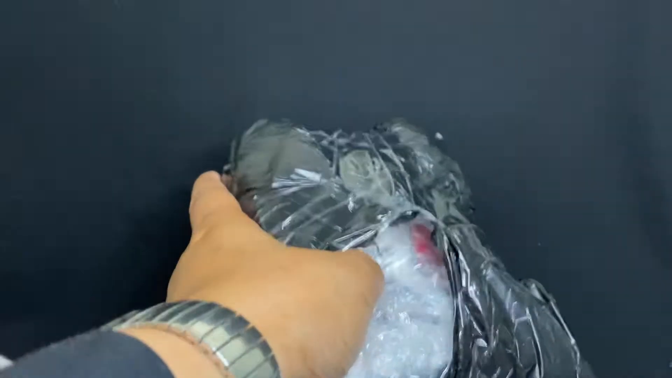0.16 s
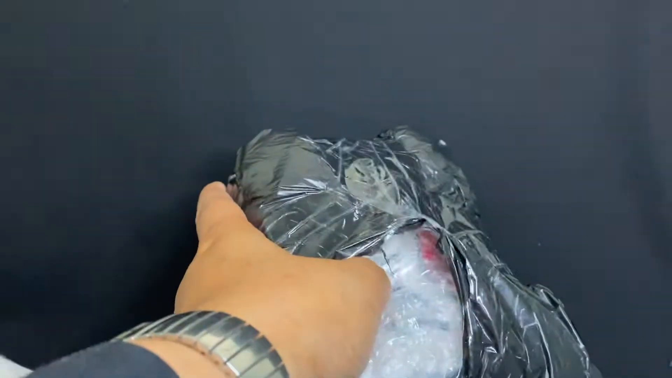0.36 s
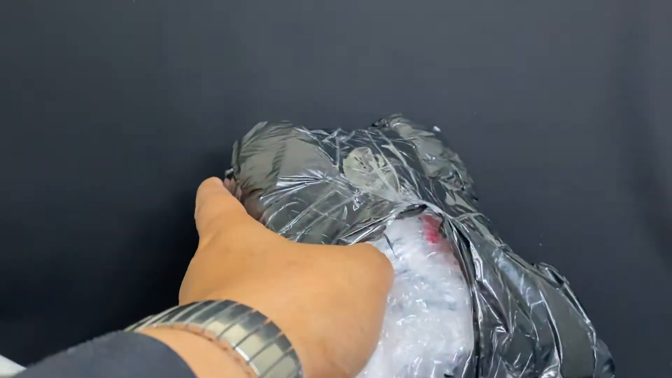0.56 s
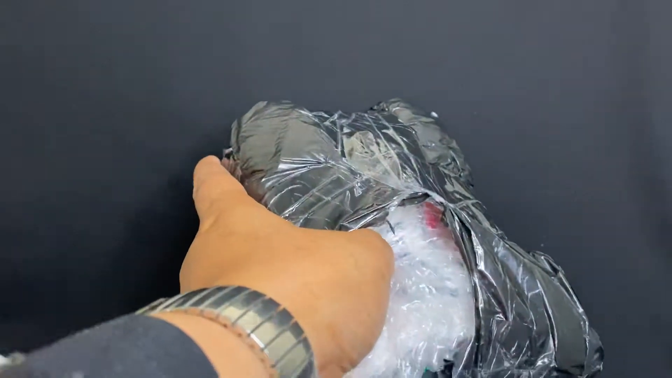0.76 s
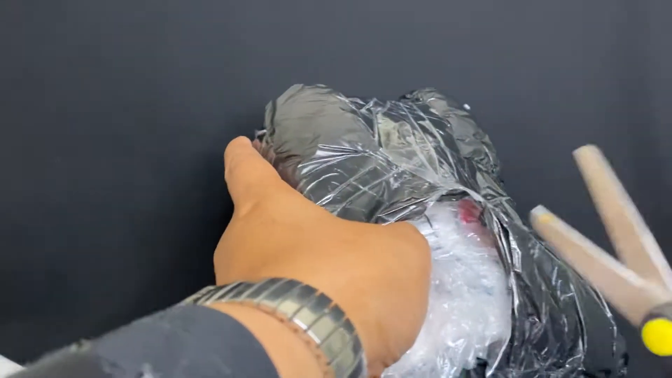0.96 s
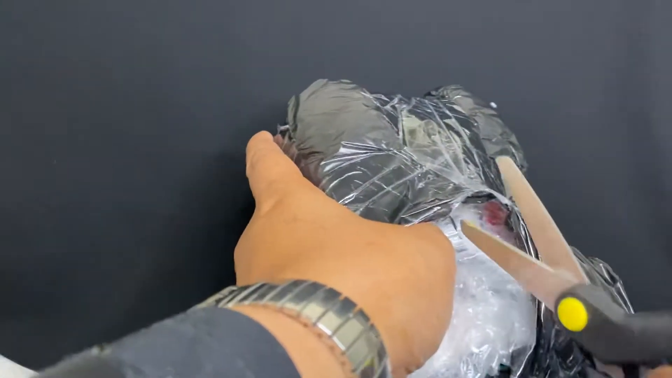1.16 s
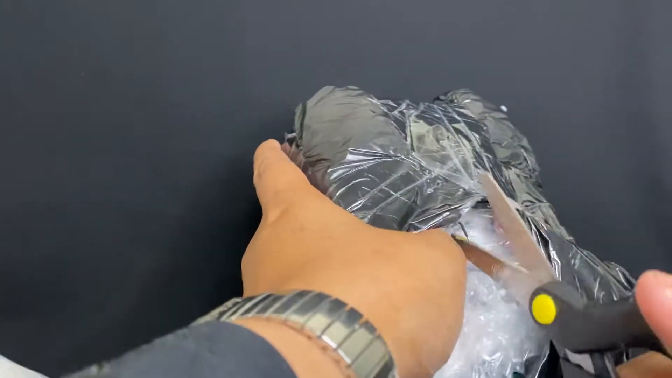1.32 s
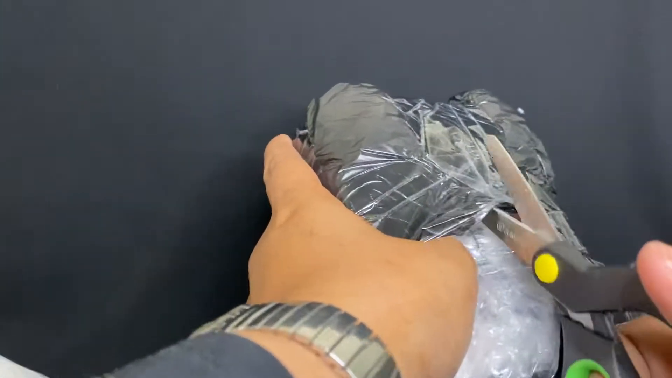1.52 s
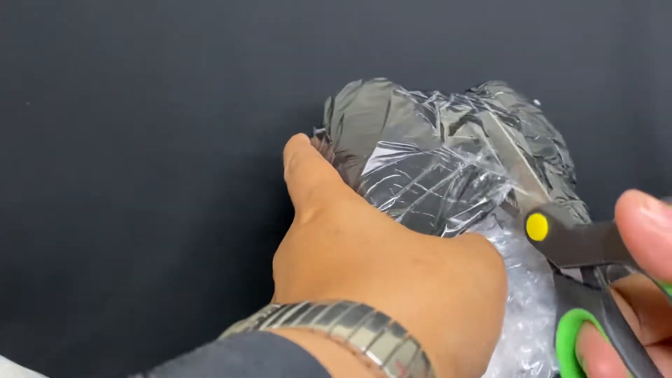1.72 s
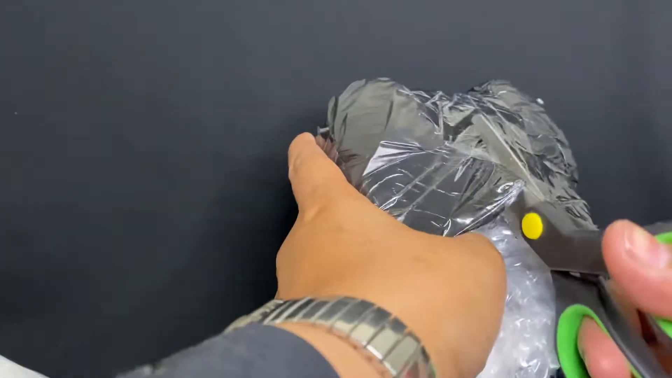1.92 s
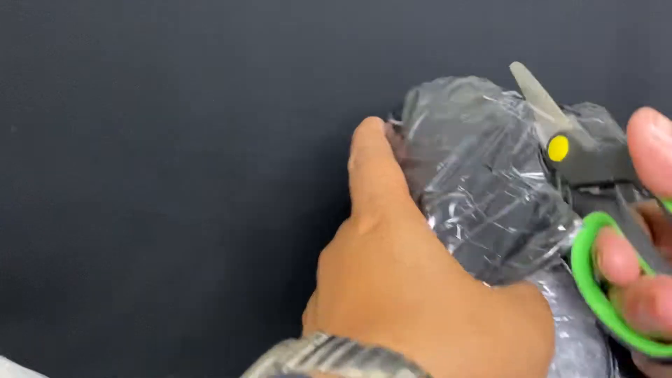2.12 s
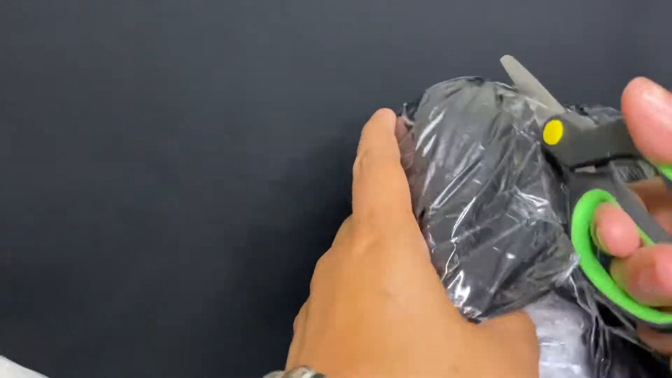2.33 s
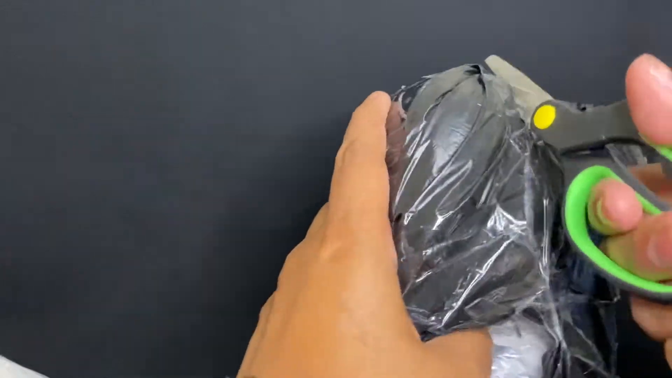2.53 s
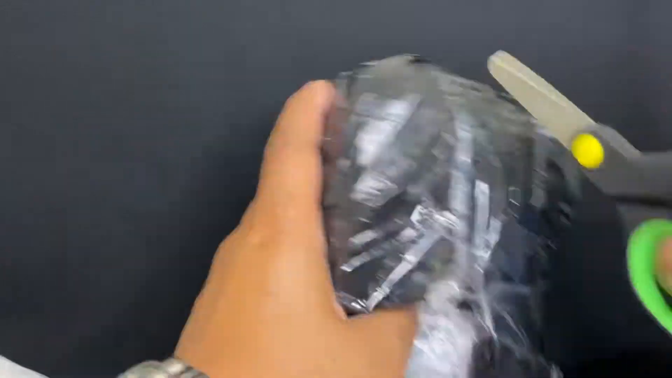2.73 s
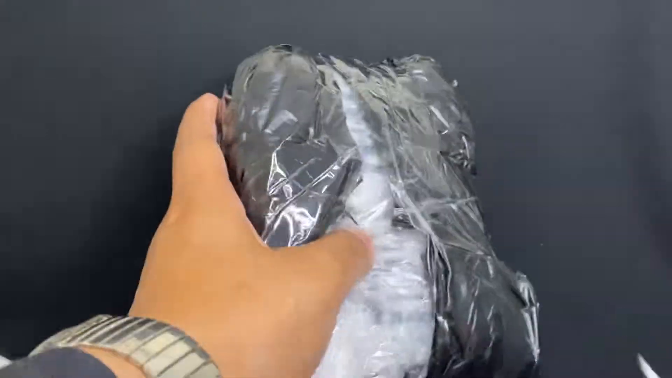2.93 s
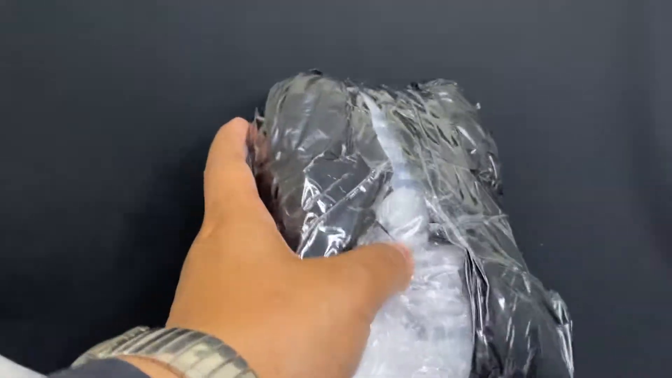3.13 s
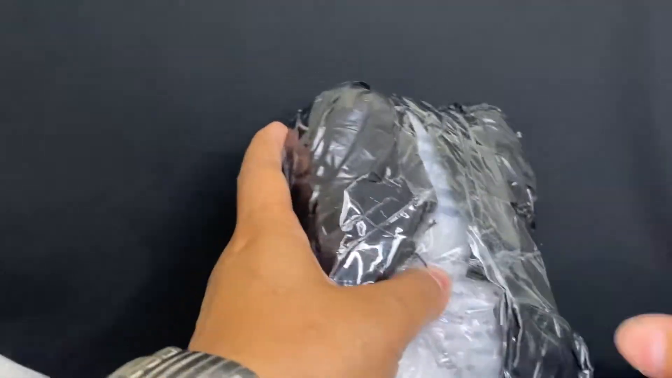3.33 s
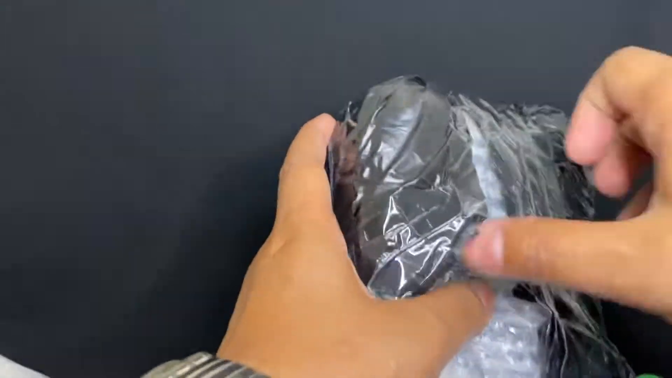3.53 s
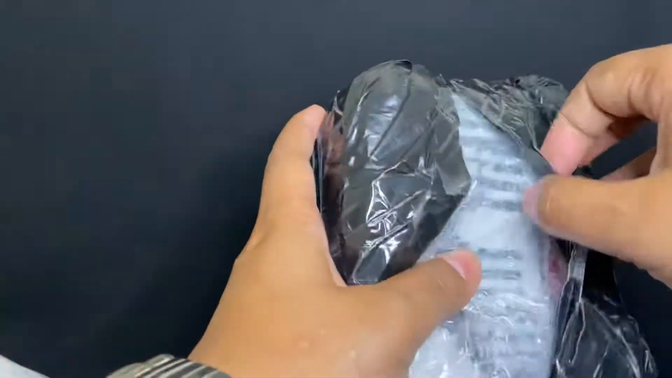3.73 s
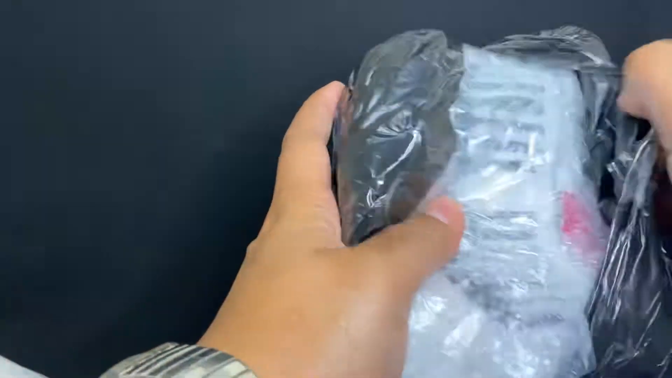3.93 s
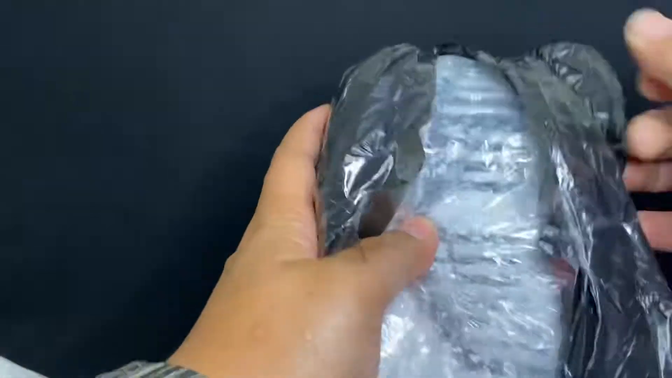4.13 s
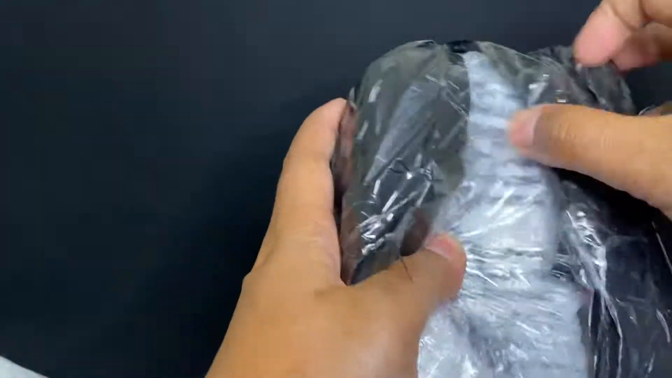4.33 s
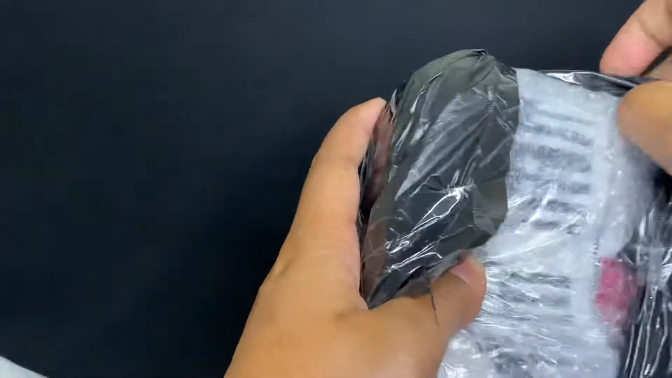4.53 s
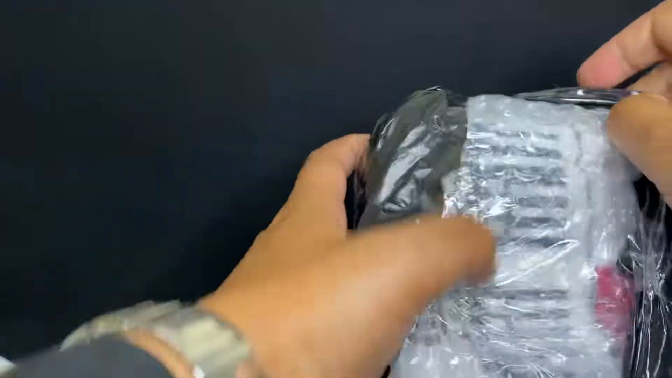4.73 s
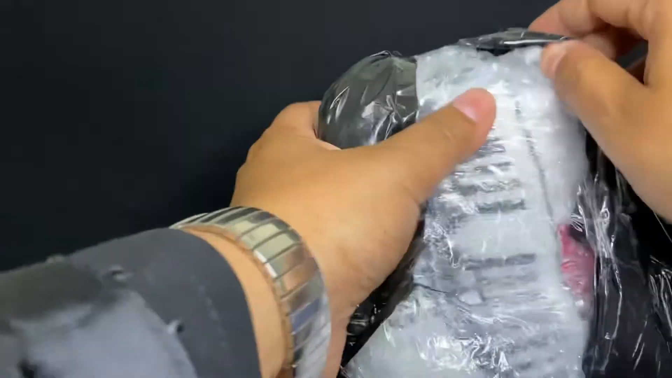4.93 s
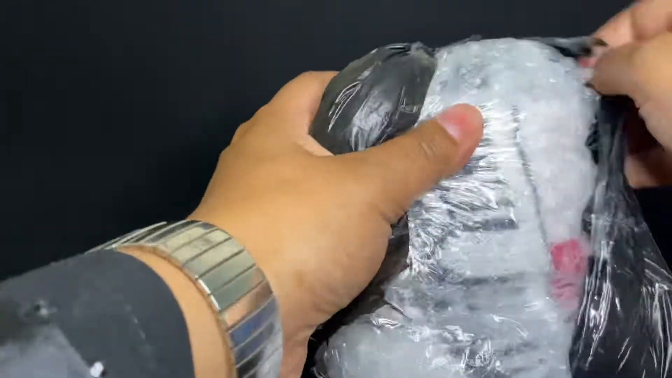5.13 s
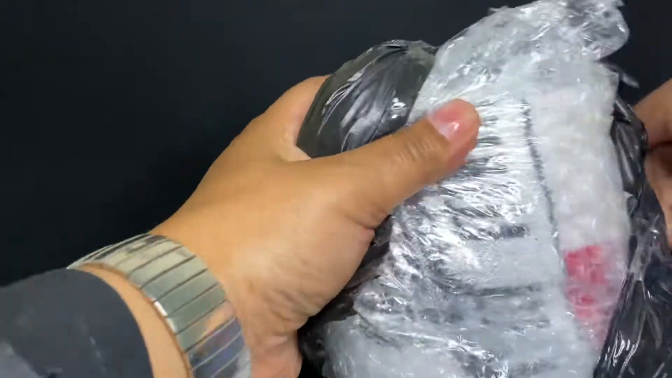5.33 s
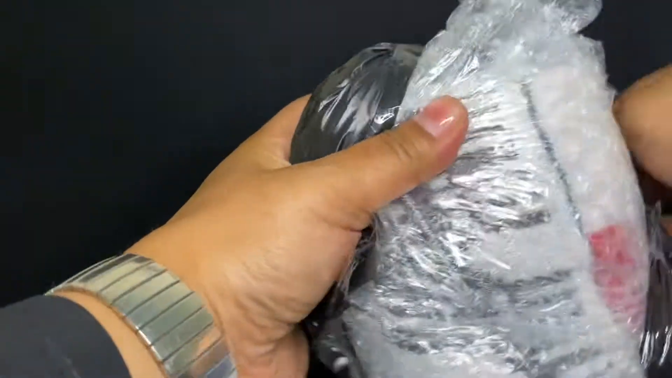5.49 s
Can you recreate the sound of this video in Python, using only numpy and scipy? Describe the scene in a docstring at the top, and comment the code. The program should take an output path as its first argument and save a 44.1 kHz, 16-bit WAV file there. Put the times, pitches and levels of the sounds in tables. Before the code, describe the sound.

Scissors rasp through a thin plastic parcel bag, clatter onto a table, then the bag is pulled off bubble wrap with dense crackling.

```python
"""A parcel in a thin plastic bag is snipped open on a table, close to the microphone.
First the plastic crackles under the hand and the parcel bumps the table. From about 1.5 s the scissors
rasp through the bag, catching, slipping and clacking shut. Just after 3 s they clatter down and make
the table ring. From about 3.5 s the bag is dragged off the bubble wrap in a dense rustle: creases flip
with sharp snaps, and the parcel bumps the table again. The room rumbles softly throughout."""
import sys
import numpy as np
from scipy import signal
from scipy.fft import rfft, irfft, next_fast_len
from scipy.io import wavfile
from scipy.ndimage import uniform_filter1d

SR = 44100
rng = np.random.default_rng(int(sys.argv[2]) if len(sys.argv) > 2 else 0)


def inscribe(sig):
    """Save sig as 16-bit PCM at rate SR to the path in sys.argv[1].

    A 1-D sig is mono; a 2-D sig holds one channel per row.
    Samples are clipped to [-1, 1] before scaling.
    """
    pcm = np.round(np.clip(np.atleast_2d(sig).T, -1, 1) * 32767)
    wavfile.write(sys.argv[1], SR, pcm.astype(np.int16))


N = 249606
TIME = np.arange(N) / SR


# Tugs on the bag: peak t/s, build-up/s, fade/s, fizz level/dB, body level compared with the fizz/dB
TUGS = [(3.62, .12, 0.23, -40, -1), (3.941, 0.076, 0.053, -31.5, -1.5), (4.039, 0.0038, 0.0076, -26, 0.5),
        (4.082, 0.009, 0.0073, -31, -1), (4.25, 0.16, 0.062, -39.5, -1), (4.36, 0.045, 0.2, -33.5, -4.5),
        (4.57, 0.038, 0.092, -39.5, 1), (4.86, 0.029, 0.077, -37, -0.5), (5.02, 0.082, 0.17, -32, -10),
        (5.1, 0.018, 0.025, -33.5, 5), (5.17, 0.024, 0.036, -29.5, 1.5), (5.28, 0.046, .07, -36.5, -2),
        (5.45, 0.096, 0.063, -33, -1.5), (5.65, 0.049, .05, -34.5, -2)]
def tug_strength(start_s=3.547, slide_fizz_db=-48.5, slide_body_db=-50.5, swell_db=6.5):
    """How strongly the dragged bag fizzes and its sheet shakes; between tugs it keeps sliding."""
    tugs = np.array(TUGS)
    fizz = np.hypot(amp(slide_fizz_db), hand_moves(tugs[:, :3], tugs[:, 3], swell_db))
    body = np.hypot(amp(slide_body_db), hand_moves(tugs[:, :3], tugs[:, 3] + tugs[:, 4], swell_db))
    return touching(start_s) * np.array([fizz, body])


# Tone of the plastic's bright fizz and of the sheet's deeper body: f/Hz, level/dB
FIZZ_TONE = [(300, -51), (1200, -3.5), (2600, 0), (4800, 1), (6000, 0), (8000, 0), (12000, 0.5),
             (16000, -3.5)]
BODY_TONE = [(50, -57), (150, -3), (500, -6), (1200, -2.5), (2400, -4.5), (4000, -9.5), (8000, -29.5)]
def bag_drag():
    """Plastic slides over bubble wrap in a dense fizz; its larger buckles also shake the whole sheet."""
    fizz_gain, body_gain = tug_strength()
    activity = clumps(depth_db=1.7, hz=107)
    fine = unit_rms(buckles(per_s=14000, spread_db=1, limit=9.6) * activity)
    rub = unit_rms(buckles(per_s=14000, spread_db=1, limit=9.6) * activity)
    large_clicks = buckles(per_s=650, spread_db=4, limit=4.9)
    coarse = unit_rms(facets(large_clicks, sharpness=1.36) * activity)
    fizz = unit_rms(colour(fine + amp(-5) * coarse, FIZZ_TONE)) * fizz_gain
    body = unit_rms(colour(coarse + amp(-1) * rub, BODY_TONE)) * body_gain
    return amp(1) * fizz + amp(-1) * body


# The loudest creases flipping over: t/s, relative pop level/dB, pop f/Hz, relative tick level/dB
LOUD_CREASES = [(.0252, -47, 2330, -44), (.2335, -65, 2070, -44), (.4993, -36, 2720, -37.5),
                (1.02, -46, 2870, -40.5), (1.4637, -48, 990, -43), (1.764, -33, 1710, -38),
                (1.7843, -24, 1650, -32), (1.7985, -24, 1680, -25.5), (2.1321, -25, 1590, -30),
                (2.2922, -29, 1560, -50), (2.4378, -21.5, 1720, -32), (2.5654, -29, 2050, -27.5),
                (2.5968, -44, 2080, -31), (2.8328, -35.5, 1910, -33.5), (2.8471, -37.5, 1470, -49),
                (2.981, -37, 1390, -42), (3.19, -40, 710, -40.5), (3.2834, -41, 1130, -41.5),
                (3.3129, -67, 3030, -41.5), (3.7045, -34, 2700, -36), (3.817, -31, 1480, -31.5),
                (3.8481, -38.5, 1460, -28.5), (3.9015, -26.5, 1270, -37), (3.9286, -21, 1120, -24),
                (3.938, -23.5, 1160, -28), (4.006, -22.5, 1350, -27), (4.036, -26, 1210, -24.5),
                (4.0808, -26, 2940, -30), (4.2398, -30.5, 1350, -36), (4.3356, -24.5, 2430, -25),
                (4.3666, -25, 1890, -21), (4.407, -24.5, 1420, -23.5), (4.497, -53, 3060, -39),
                (4.5578, -13.5, 1400, -30), (4.571, -27.5, 1290, -35), (4.6242, -27.5, 1260, -28),
                (4.8429, -29.5, 1230, -45.5), (5.0145, -39, 2290, -35), (5.0985, -26, 1940, -23),
                (5.107, -25, 1800, -25.5), (5.1495, -19, 1470, -20.5), (5.1553, -19.5, 1300, -16.5),
                (5.1828, -35, 1610, -25), (5.423, -50, 2060, -27), (5.5211, -27, 3270, -27),
                (5.563, -36, 1290, -32), (5.5705, -57, 2630, -31.5), (5.629, -24, 1100, -29)]
def crease_snaps(pop_cycles=0.92, tick_s=0.00053, shiver_s=0.006):
    """A crease flips: a sharp tick, a very short pop, and a shiver of the plastic around it."""
    out, t = np.zeros(N), np.arange(SR // 25) / SR
    for start, pop_db, hz, tick_db in [*LOUD_CREASES, *small_creases()]:
        crack_noise, shiver_noise = rng.standard_normal((2, len(t)))
        pop = unit_energy(np.sin(2 * np.pi * hz * t) * np.exp(-t * hz / pop_cycles))
        spike = np.roll(t == 0, round(SR * tick_s / 2))
        crack = unit_energy(crack_noise * np.exp(-t / tick_s)) + amp(-8.5) * spike
        tick = unit_energy(colour(crack, FIZZ_TONE))
        shiver = unit_energy(colour(shiver_noise * np.exp(-t / shiver_s), BAG_TONE))
        add(out, start, amp(pop_db + 19.5) * (pop + amp(-8) * shiver) + amp(tick_db + 21.5) * tick)
    return out


def small_creases(count=200, per_s=16, middle_hz=1800, spread_octaves=0.59):
    """Rows of small creases that flip by chance, louder the harder the bag is worked."""
    wait, pop, pitch, tick = rng.random((count, 4)).T * 2
    times = np.cumsum(wait) / per_s
    effort = np.hypot(amp(4.5) * grip_strength(), tug_strength()[0])
    effort_db = 20 * np.log10(np.interp(times, TIME, effort))
    pop_db = effort_db - 3 + 6 * (pop - 1)
    tick_db = effort_db + 1 + 3 * (tick - 1)
    hz = middle_hz * 2 ** (spread_octaves * (pitch - 1))
    return np.c_[times, pop_db, hz, tick_db][times < N / SR]


# Scissor pushes: peak t/s, build-up/s, fade/s, then relative levels: rasp/dB, crackle/dB, scrape/dB
STROKES = [(1.586, .13, 0.096, -39, -44, -60), (1.79, 0.049, 0.043, -38, -44.5, -50.5),
           (2.015, 0.032, 0.098, -29.5, -32, -39), (2.085, 0.073, 0.053, -31, -32.5, -37.5),
           (2.245, .025, 0.038, -38, -41.5, -51), (2.305, 0.024, 0.028, -35, -36, -45),
           (2.43, 0.097, 0.07, -40.5, -41.5, -54.5), (2.55, 0.075, .04, -62, -53, -46.5),
           (2.691, 0.044, 0.029, -47, -39, -51)]
RASP_COLUMN, CRACKLE_COLUMN, SCRAPE_COLUMN = 3, 4, 5
def cut_strength(column, start_s=1.447):
    """How strong one part of the cutting sound is as the blades push through the bag."""
    strokes = np.array(STROKES)
    return touching(start_s) * hand_moves(strokes[:, :3], strokes[:, column], swell_db=9.5)


# The blades catch and let go: t/s, relative level/dB
BLADE_SLIPS = [(1.9932, -7.5), (2.0013, -8.5), (2.0131, -8), (2.0253, -12)]
def scissor_rasp(ring_hz=1680, width_hz=560):
    """The blades stick and slip along the plastic; each slip rings the tight cut edge."""
    edges_hz = [ring_hz - width_hz / 2, ring_hz + width_hz / 2]
    band = signal.butter(2, edges_hz, "band", fs=SR, output="sos")
    rasp = unit_rms(signal.sosfilt(band, buckles(per_s=3500, spread_db=2, limit=1.4)))
    out = amp(-8) * rasp * cut_strength(RASP_COLUMN)
    ring = unit_peak(signal.sosfilt(band, signal.unit_impulse(SR // 50)))
    for start, db in BLADE_SLIPS:
        add(out, start, amp(db - 8) * ring)
    return out


# The blades shutting: t/s, level/dB
CLACKS = [(1.784, -15.5), (1.7962, -25)]
# The notes they ring with: f/Hz, relative level/dB, time to fade by 60 dB/s
BLADE_NOTES = [(880, -20, 0.045), (1680, -8, 0.039), (1890, 2, .04), (3136, 3, 0.018)]
def scissor_clacks():
    """The blades close on the plastic and ring briefly, muffled by the hand."""
    out, t = np.zeros(N), np.arange(SR // 8) / SR
    ring = sum(amp(db - 60 * t / fade_s) * np.sin(2 * np.pi * hz * t) for hz, db, fade_s in BLADE_NOTES)
    for start, db in CLACKS:
        add(out, start, amp(db) * unit_peak(ring))
    return out


# Tone of the parcel under the blades: f/Hz, level/dB
PARCEL_TONE = [(50, -38), (130, 7.5), (250, -6), (450, -5), (750, 5.5), (1200, -15), (2500, -21.5),
               (6000, -28)]
def parcel_scrape():
    """The catching blades also shake the whole parcel, in a dull, grainy scrape."""
    grains = unit_rms(colour(buckles(per_s=600, spread_db=6.5, limit=2.4), PARCEL_TONE))
    return amp(-1) * grains * cut_strength(SCRAPE_COLUMN)


# Knocks on the table: t/s, relative level/dB, contact time/ms, extra bass/dB, extra hollow note/dB
KNOCKS = [(.094, -9.5, 2.05, 4.5, -0.5), (.217, -19.5, 2.9, 1, -14), (.436, -11.5, 1.58, -5.5, -7.5),
          (1.7829, -11, 0.47, -15, 3), (2.043, -14, 0.3, -8, -7), (2.084, -18, 0.3, 0.5, 0),
          (2.436, -13, 0.54, -10, -8), (2.574, -22, 0.34, -4, 1), (2.683, -24.5, 0.3, -1, -12),
          (3.0437, -2.5, 0.31, 2, -4.5), (3.1415, -6.5, 0.9, -0.5, 0.5), (3.4416, -3.5, 0.37, 4, 10),
          (3.475, 4, 0.22, -16, 6), (3.495, -4.5, 0.47, 2.5, -2), (3.515, -3, 0.53, -5.5, 4),
          (3.56, -8.5, 1.4, -15.5, 2), (3.925, -10.5, .78, -2.5, 2.5), (4.034, -7.5, 0.78, 5, 1.5),
          (4.079, -14, 2.4, -18, 2), (4.557, -16.5, 0.17, -1.5, 4), (4.767, -27.5, 0.64, -3.5, 3),
          (5.152, -6, 0.69, -11, 3), (5.597, -22.5, 0.47, 3.5, -7), (5.629, -19, 0.37, -9, -3)]
# The notes the table top rings with: f/Hz, relative level/dB, time to fade by 60 dB/s
TABLE_NOTES = [(59.7, -22, 0.7), (82.4, -19.5, 0.23), (92.4, -13.5, 0.26), (111.8, -18.5, 0.28),
               (147.3, -17.5, 0.32), (155.8, -34, 0.22), (189, -29.5, 0.27), (216, -15.5, .2),
               (247, -39, 0.35), (330, -25.5, 0.086), (350, -28.5, 0.18), (406.3, -21, 0.11),
               (444, -47, 0.17), (485.5, -18.5, 0.061), (622, -33, 0.21), (669.5, -22, 0.09),
               (794, -22, 0.14), (866.6, -17, 0.085), (910, -62, 0.092), (1234, -14.5, 0.034),
               (1350, -35, 0.051), (1480, -29, 0.13), (1800, -58, 0.055), (2575, -3.5, 0.013)]
# Tone of its thud: f/Hz, level/dB
THUD_TONE = [(25, -38), (55, -16.5), (95, 11.5), (200, 3), (300, -14), (420, -6.5), (600, -29),
             (850, -14.5), (1350, -18.5), (1800, -11.5), (2700, -18), (4500, -24), (9000, -27.5)]
def table_knocks(rattle_fade_s=0.12, hollow_hz=350, hollow_width_hz=130):
    """Each knock bends the table top in waves, high notes arriving first, and leaves it ringing."""
    t, hz = np.arange(SR) / SR, np.fft.rfftfreq(SR, 1 / SR)
    notes = sum(amp(db - 60 * t / fade_s) * np.cos(2 * np.pi * f * t) for f, db, fade_s in TABLE_NOTES)
    ring = amp(-3.5) * rfft(notes) / (1 + (hz / 2600) ** 4)  # the ringing starts without a click
    thud = amp(22) * rfft(shaped_click(THUD_TONE), SR)
    delay_s = 0.0085 / np.sqrt(1 + (hz / 260) ** 2.6)
    bending = np.exp(-2j * np.pi * np.cumsum(delay_s))
    bass = 1 / (1 + (hz / 280) ** 4)
    hollow = np.exp(-((hz - hollow_hz) / hollow_width_hz) ** 2)
    out = np.zeros(N)
    for start, db, contact_ms, bass_db, hollow_db in KNOCKS:
        # fading noise stands for the table's many high notes
        rattle = rfft(unit_energy(rng.standard_normal(SR) * amp(-60 * t / rattle_fade_s)))
        softness = 1j * hz * contact_ms / 1000
        muffle = 1 / ((1 + softness) * (1 + softness + softness ** 2))  # a soft knock sounds dull
        knock = (thud * (1 + rattle * (1 - bass)) + ring) * bending * muffle
        gain = amp(db + bass_db * bass + hollow_db * hollow)
        add(out, start, irfft(knock * gain, SR)[:3 * SR // 4])
    return cut_bass(out, hz=40)  # the knocks carry no deep bass


# The holding hand squeezes the bag: peak t/s, build-up/s, fade/s, relative level/dB
SQUEEZES = [(.045, 0.044, 0.049, -55), (.25, 0.3, 0.52, -58), (.51, 0.17, 0.15, -58),
            (.79, 0.074, 0.15, -58), (1.21, 0.036, 0.044, -60), (1.328, .015, 0.033, -52.5),
            (2.7, 0.28, 0.3, -53), (2.93, 0.25, 0.75, -54.5)]
def grip_strength(resting_db=-75):
    """How hard the held bag is worked by the resting hand, its squeezes and the push of the blades."""
    squeezes = np.array(SQUEEZES)
    hand = hand_moves(squeezes[:, :3], squeezes[:, 3], swell_db=8.5)
    return np.sqrt(amp(resting_db) ** 2 + hand ** 2 + cut_strength(CRACKLE_COLUMN) ** 2)


# Tone of the held bag: f/Hz, level/dB
BAG_TONE = [(50, -45), (150, 9), (400, 1.5), (800, 2.5), (1700, 0), (3000, -0.5), (6000, -3.5), (11000, -1),
            (16000, -7)]
def bag_crackle():
    """Held plastic creaks in separate ticks, which merge into a rasp as it is worked harder."""
    grip = grip_strength()
    sparse = facets(buckles(per_s=300, spread_db=3.5, limit=3.6), sharpness=5.9)
    dense = buckles(per_s=7000, spread_db=0.5, limit=5.4) * clumps(depth_db=3.5, hz=124)
    effort = grip / (grip + amp(-65.5))  # 0 is gentle, 1 is hard
    ticks = amp(-2) * np.sqrt(1 - 0.98 * effort) * unit_rms(colour(sparse, BAG_TONE))
    rasp = amp(2) * np.sqrt(0.035 + 0.28 * effort) * unit_rms(colour(dense, BAG_TONE))
    return amp(3.5) * grip * (ticks + rasp)


# How long the room echoes: f/Hz, time to fade by 60 dB/s
ECHO_FADE = [(100, 0.38), (1000, 0.2), (4000, .2), (16000, 0.077)]
def room_echo(x, near_db=-10.5, far_db=-14, near_s=0.00077):
    """Sound bounces off the parcel and table, then around a small room, differently left and right."""
    t = np.arange(SR // 2) / SR
    near, far = rng.standard_normal((2, 2, len(t)))
    near = near * np.exp(-t / near_s) * (t > 0.0004)
    hz, when, bands = signal.stft(far * (t > 0.005), SR, nperseg=256)
    fade = amp(-60 * when / value_at(ECHO_FADE, hz)[:, None])
    far = signal.istft(bands * fade, SR, nperseg=256)[1][:, :len(t)]
    echo = sum(amp(db) * part / np.linalg.norm(part, axis=1, keepdims=True)
               for db, part in [(near_db, near), (far_db, far)])
    echo = cut_bass(echo, hz=350)  # long waves reach both sides alike
    return x + signal.fftconvolve(x, echo, axes=1)[:, :N]


# Tone of the quiet room: f/Hz, level/dB
RUMBLE_TONE = [(20, -38), (40, -6), (60, 6), (90, -1), (150, -7), (300, -20.5), (600, -34.5), (1200, -38),
               (3000, -61), (16000, -95)]
def room_rumble():
    """A low, steady rumble with a faint hiss."""
    return amp(-51.5) * unit_rms(colour(rng.standard_normal(N), RUMBLE_TONE))


def buckles(per_s, spread_db, limit):
    """Plastic buckles in tiny random clicks: many small, a few large."""
    size = amp(spread_db * np.minimum(rng.exponential(1, N), limit))
    return size * rng.choice([-1, 1], N) * (rng.random(N) < per_s / SR)


def clumps(depth_db, hz):
    """A wavering gain: one buckle sets off its neighbours, so clicks come in clumps."""
    slow = signal.sosfilt(signal.butter(2, hz, fs=SR, output="sos"), rng.standard_normal(N))
    return amp(depth_db * unit_rms(slow))


def facets(clicks, sharpness, count=7):
    """Each click rings one flat patch of the crumpled plastic, large and low or small and high."""
    patch = rng.integers(0, count, N)
    return sum((-1) ** k * signal.lfilter(*signal.iirpeak(hz, sharpness, SR), clicks * (patch == k))
               for k, hz in enumerate(np.geomspace(600, 12000, count)))


def hand_moves(timing, levels_db, swell_db, roundness=1.43):
    """Each move rises by swell_db over its build-up time and drops as much over its fade time."""
    power = np.zeros(N)
    for (peak, build, fade), db in zip(timing, levels_db):
        away = np.maximum((peak - TIME) / build, (TIME - peak) / fade)
        near = away < 6
        power[near] += amp(db - swell_db * away[near] ** roundness) ** 2
    return np.sqrt(power)


def touching(start_s, rise_s=0.0022):
    """Rubbing starts almost at once when two surfaces meet."""
    return np.clip((TIME - start_s) / rise_s, 0, 1)


def spread(x):
    """Each crackle comes from another spot on the parcel, a little to the left or right."""
    pan = 0.28 * unit_rms(uniform_filter1d(rng.standard_normal(N), 70))
    return x * np.array([1 + pan, 1 - pan])


def amp(db):
    """Turns decibels into a gain."""
    return 10 ** (np.asarray(db) / 20)


def unit_rms(x):
    """Scales to an average power of one."""
    return x / np.sqrt(np.mean(x ** 2) + 1e-20)


def unit_peak(x):
    """Scales to a peak of one."""
    return x / (abs(x).max() + 1e-20)


def unit_energy(x):
    """Scales to a total energy of one."""
    return x / np.linalg.norm(x)


def value_at(points, hz):
    """Reads between a table's rows, with the frequencies spaced by octaves."""
    f, value = np.transpose(points)
    return np.interp(np.log(hz + 1), np.log(f + 1), value)


def add(mix, start_s, sound):
    """Mixes a sound in at a given time."""
    part = mix[max(round(start_s * SR), 0):][:len(sound)]
    part += sound[:len(part)]


def shaped_click(tone, size=4096):
    """A click with the given tone, silent before it is struck."""
    log_gain = np.log(amp(value_at(tone, abs(np.fft.fftfreq(size, 1 / SR)))))
    return np.fft.ifft(np.exp(np.conj(signal.hilbert(log_gain)))).real


def colour(x, tone):
    """Gives a sound the tone in a table."""
    return signal.oaconvolve(x, shaped_click(tone))[:len(x)]


def cut_bass(x, hz):
    """Turns down everything below a frequency."""
    return signal.sosfilt(signal.butter(2, hz, "high", fs=SR, output="sos"), x)


def scene():
    """The bag, the scissors and the table, heard together in a small room."""
    knocks = table_knocks()
    rustle = spread(bag_drag() + bag_crackle() + scissor_rasp() + parcel_scrape())
    return room_echo(rustle + crease_snaps() + scissor_clacks() + knocks + room_rumble())


# How far the wave at the left microphone opening is ahead of the right: f/Hz, phase/rad
LEFT_LEAD = [(0, 0), (1720, -0.1), (3100, 0.3), (3790, 0.1), (7490, -0.0), (8440, -3.0), (9560, -3.3),
             (10400, -6.1), (11600, -6.4), (12500, -9.2), (13700, -9.5), (14200, -10.7), (14600, -12.4),
             (16500, -12.7)]
# How much louder the left is than the right: f/Hz, level/dB
LEFT_BALANCE = [(60, 0.5), (110, -2.2), (200, 5), (380, -4.5), (700, 3), (1290, 1.3), (2380, 1.6),
                (4400, 2.5), (8120, 0.4), (15000, 0.0)]
def record(dry, top_hz=15900):
    """The microphone's two openings differ in level and treble timing; the very top is cut off."""
    size = next_fast_len(N + SR // 10)
    hz = np.fft.rfftfreq(size, 1 / SR)
    lead = np.interp(hz, *np.transpose(LEFT_LEAD))
    tilt = amp(value_at(LEFT_BALANCE, hz) / 2)
    openings = np.array([tilt * np.exp(1j * lead), 1 / tilt])
    stereo = irfft(rfft(dry, size) * openings, size)[:, :N]
    treble_cut = signal.firwin(511, top_hz, window=("kaiser", 9), fs=SR)
    return signal.oaconvolve(stereo, treble_cut[None], "same")


dry = scene()
out = record(dry)
inscribe(out)
```